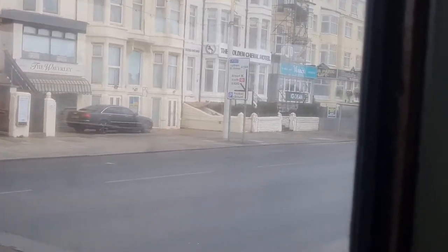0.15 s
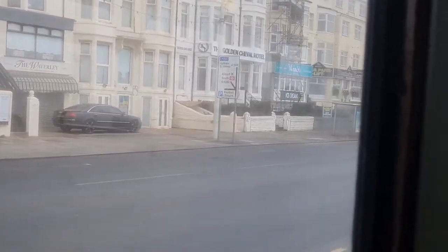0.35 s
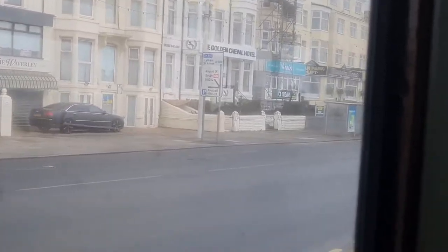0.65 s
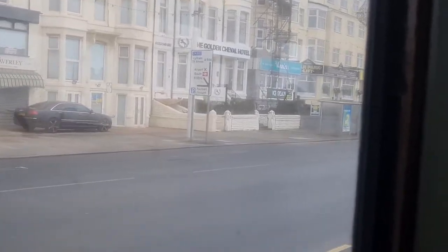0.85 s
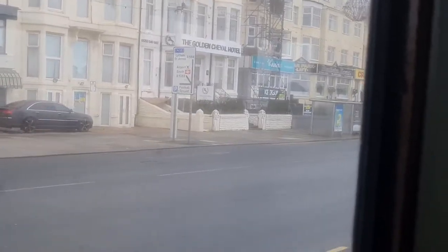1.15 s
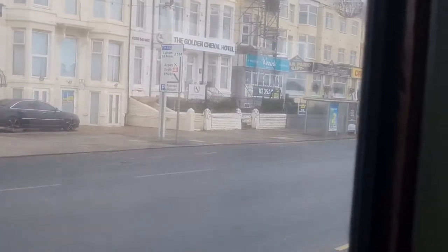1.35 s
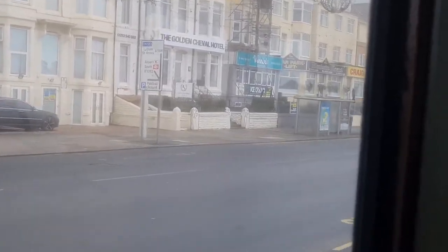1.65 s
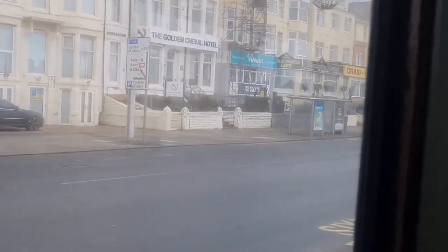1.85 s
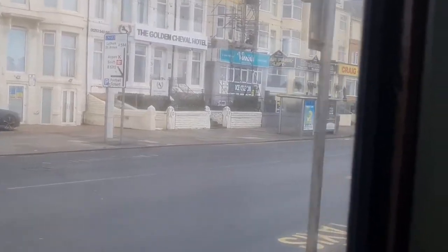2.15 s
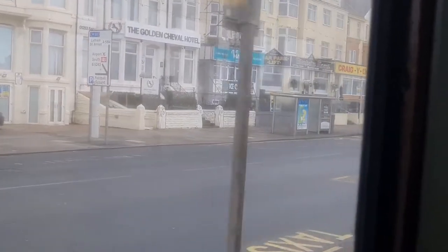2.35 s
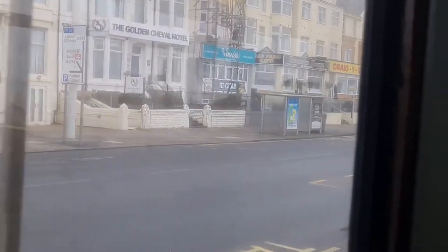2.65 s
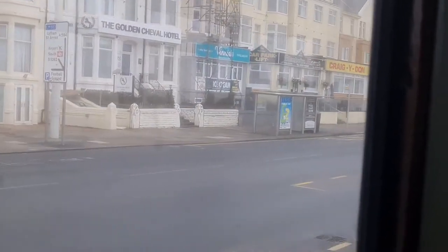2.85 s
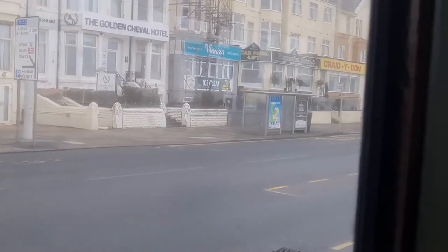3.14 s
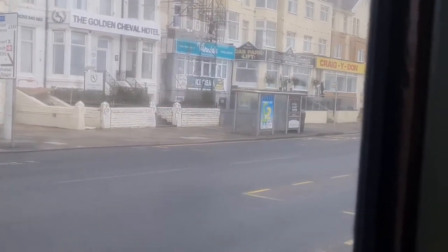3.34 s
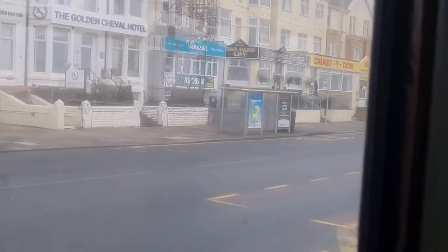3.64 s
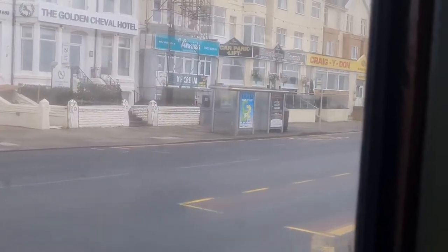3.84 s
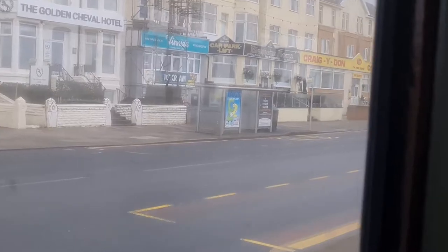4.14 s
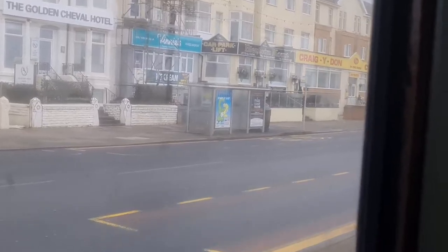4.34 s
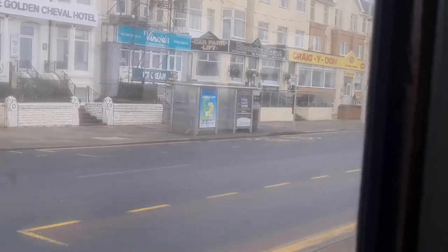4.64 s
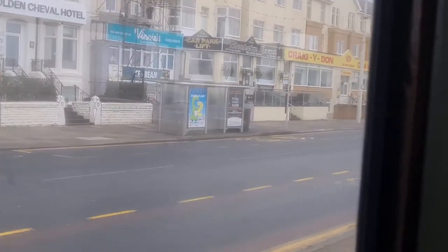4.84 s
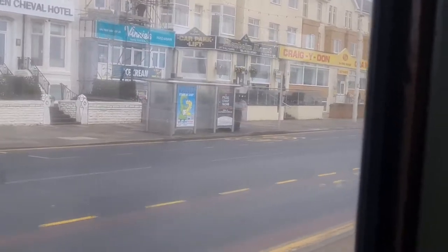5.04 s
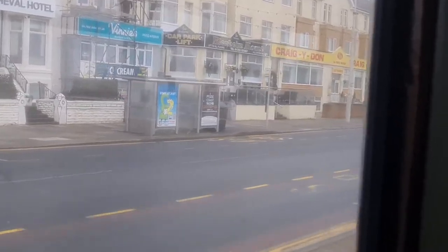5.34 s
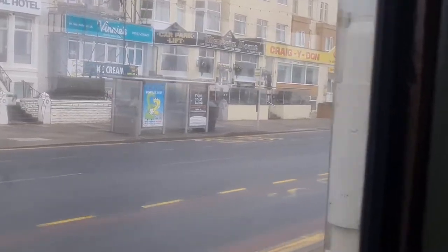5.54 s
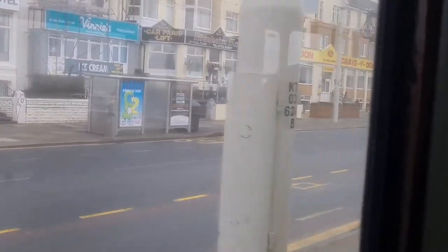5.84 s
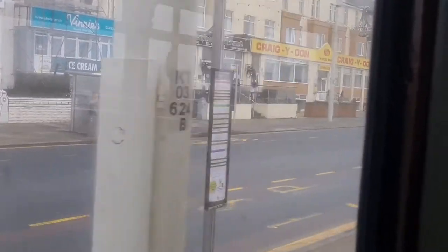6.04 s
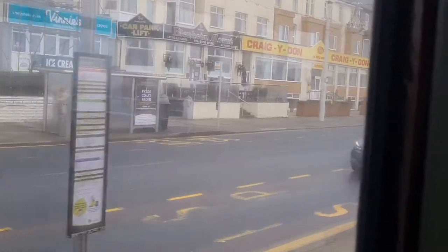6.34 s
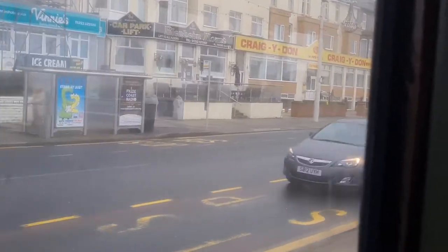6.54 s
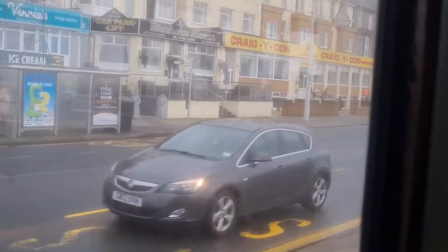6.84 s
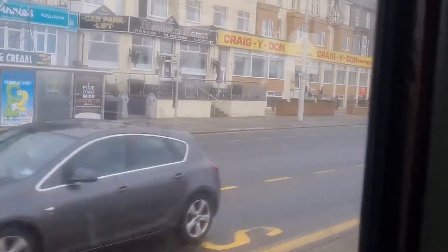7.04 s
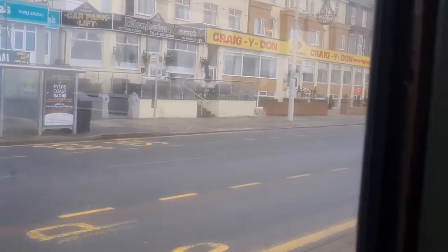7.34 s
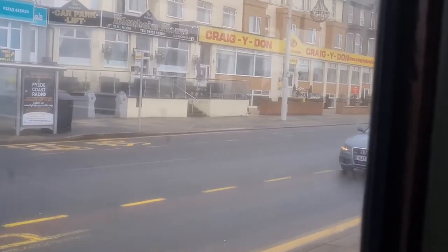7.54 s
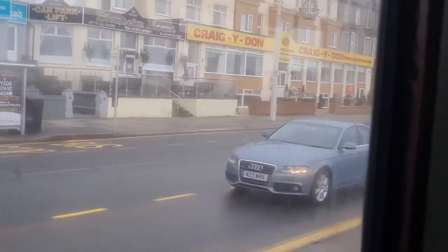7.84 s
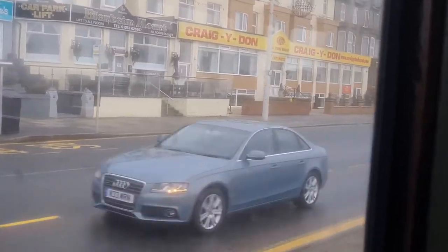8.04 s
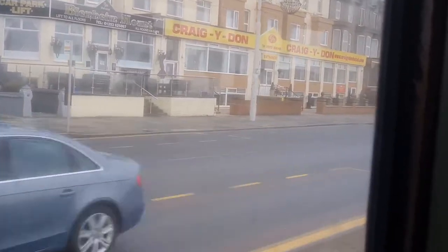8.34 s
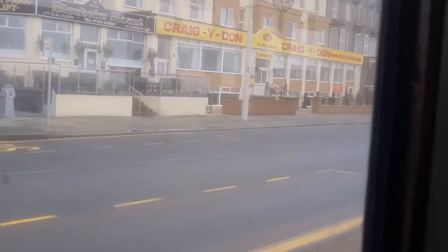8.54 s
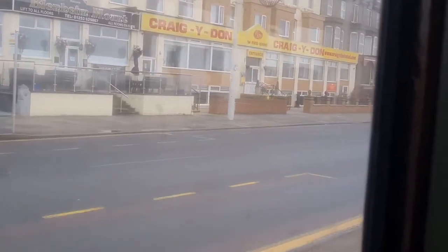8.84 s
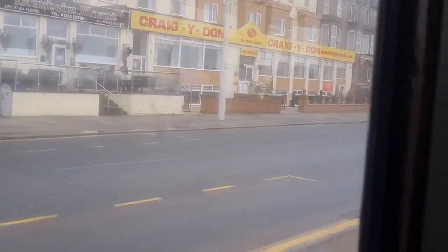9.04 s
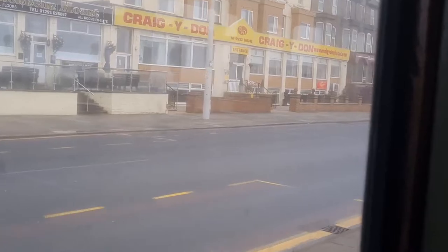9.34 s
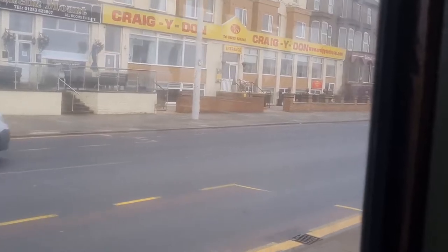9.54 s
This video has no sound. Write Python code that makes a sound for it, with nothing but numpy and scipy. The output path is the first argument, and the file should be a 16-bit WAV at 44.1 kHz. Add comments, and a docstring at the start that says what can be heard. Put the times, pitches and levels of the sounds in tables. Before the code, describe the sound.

Inside a rattling tram on uneven rails, deep booming rumble swells and eases, with panel rattle, faint squeaks, knocks and soft wet-road hiss.

```python
"""Inside a tram car on a seafront line. From the start uneven rails shake the shell, which booms at two low
modes, and the wheels rumble through the floor; panels rattle and fittings knock at jolts. Traction fizz and
faint hum run under it, wet tyres hiss outside in gusts. Joints squeak from 1.9 s; a wheel sings from 2.2 to
3.4 s; metal ticks ring from 4 s. The hardest knock falls at 6.9 s, the strongest boom at 7.7 s, gusts of
hiss at 7.6 and 8.3 s; near 9 s the rolling sinks, then swells again. Noise is shaped; modes are tones."""
import sys
import numpy as np
from scipy import signal
from scipy.fft import rfft, irfft, next_fast_len
from scipy.io import wavfile
from scipy.ndimage import uniform_filter1d, map_coordinates

SR = 44100
rng = np.random.default_rng(int(sys.argv[2]) if len(sys.argv) > 2 else 0)


def log_audio(samples):
    """Write samples as a 16-bit WAV file to the path given in sys.argv[1]."""
    # one column per channel
    frames = np.atleast_2d(samples).T
    # limit to full scale, then quantise
    limited = np.clip(frames, -1, 1)
    pcm = np.round(limited * 32767).astype(np.int16)
    wavfile.write(sys.argv[1], SR, pcm)


N = 426888
CONTROL_STEP = 64  # samples per point of the slow curves


def amp(db):
    """Decibels to amplitude."""
    return 10 ** (np.asarray(db) / 20)


def unit(x):
    """Scale to rms 1."""
    return x / np.sqrt(np.mean(np.abs(x) ** 2) + 1e-20)


def along(points, hz):
    """Interpolate (frequency [Hz], value) points on a log-frequency axis."""
    point_hz, value = np.transpose(points)
    return np.interp(np.log(hz + 1), np.log(point_hz + 1), value)


def curves(rows):
    """One value per sample for each column after the time."""
    time_s, *columns = np.transpose(rows)
    return [np.interp(np.arange(N) / SR, time_s, column) for column in columns]


def wobble(rate_hz):
    """Smooth random curve, rate_hz knots a second."""
    knots = rng.standard_normal(int(N * rate_hz / SR) + 4)
    return map_coordinates(knots, [np.arange(N) * rate_hz / SR])


def filtered(x, response):
    """Apply a complex frequency response; mirrored ends keep the edges from ringing."""
    edge = 4096
    x = np.pad(x, [(0, 0)] * (x.ndim - 1) + [(edge, edge)], "reflect")
    m = next_fast_len(N + 2 * edge)
    spectrum = rfft(x, m) * response(np.fft.rfftfreq(m, 1 / SR))
    return irfft(spectrum, m)[..., edge:edge + N]


# cabin diffuseness: (frequency [Hz], left-right correlation [-1..1])
LIKENESS = [(60, .95), (130, .97), (290, .8), (640, .22), (1410, -.14), (3100, .06), (15000, .1)]


def rush(spectrum, patchy_db, peaks=(), size=512):
    """Stereo noise of rms 1: spectrum, resonant peaks, patchy gain, left-right likeness of the cabin."""
    grid = signal.stft(rng.standard_normal((2, N)), nperseg=size)[2]
    patches = uniform_filter1d(rng.standard_normal(grid.shape[1:]), size=4, axis=0)
    patches = uniform_filter1d(patches, size=2 + 4096 // size, axis=1)
    pair = signal.istft(grid * amp(patchy_db * unit(patches)), nperseg=size)[1][:, :N]

    def mid_side(hz):
        turn = np.arccos(np.clip(along(LIKENESS, hz), -1, 1)) / 2
        lift_db = sum(db / (1 + (2 * (hz - center) / width) ** 2) for center, width, db in peaks)
        return amp(along(spectrum, hz) + lift_db) * [np.cos(turn), np.sin(turn)]

    mid, side = filtered(pair, mid_side)
    return unit(np.array([mid + side, mid - side]))


def tone(hz, width_hz, lead_rad, flutter_db, bend_hz=0):
    """Unsteady tone of rms about 1, its pitch wandering with its width; the left ear leads by lead_rad."""
    pitch_hz = hz + bend_hz + 0.4036 * width_hz * wobble(width_hz)
    phase = 2 * np.pi * np.cumsum(pitch_hz) / SR + rng.uniform(0, 2 * np.pi)
    level = np.sqrt(2) * amp(flutter_db * wobble(width_hz))
    return level * np.sin(phase + [[lead_rad / 2], [-lead_rad / 2]])


BOOM_RISE = 0.48  # share of a boom spent swelling


def swell(after_s, length_s):
    """Smooth hump peaking at after_s = 0, rising faster than it falls."""
    share = np.where(after_s < 0, BOOM_RISE, 1 - BOOM_RISE)
    return np.cos(np.pi / 2 * np.clip(after_s / length_s / share, -1, 1)) ** 2


# shell modes by name: (frequency [Hz], width [Hz])
SHELL_MODES = {"low": (55.5, 13), "high": (76.5, 14)}
# booms: (time of peak [s], length [s], pitch heard [Hz], peak level [dB])
SHELL_BOOMS = [(0.034, .2, 55.7, -14), (0.281, 0.16, 56.4, -13), (0.356, 0.13, 55.9, -14.5),
               (0.581, 0.08, 54.16, -12.5), (.72, 0.18, 57.9, -19), (0.979, .2, 50.94, -12),
               (1.147, 0.12, 54.3, -14), (1.334, 0.18, 59.7, -11.5), (1.479, .2, 55.05, -12),
               (1.619, 0.11, 69.7, -13), (1.721, 0.32, 56.25, -10), (1.785, 0.11, 74.2, -9.5),
               (1.967, .14, 78.2, -11.5), (2.067, .1, 65.6, -11), (2.147, .1, 67.3, -10.5),
               (2.227, 0.15, 54.1, -16.5), (2.344, 0.096, 66.2, -14.5), (2.63, .1, 78.25, -14),
               (2.733, 0.18, 58.62, -15.5), (2.875, 0.2, 58.2, -14.5), (3.122, .16, 57.98, -13),
               (3.236, 0.13, 56.97, -11), (3.375, 0.1, 54.2, -11), (3.473, 0.1116, 67.25, -4.5),
               (3.579, 0.12, 57.16, -12.5), (3.714, .2, 57.1, -9.5), (3.797, 0.12, 59.46, -6.5),
               (4.394, .2, 71.86, -18), (4.49, 0.12, 57.27, -15.5), (4.718, .12, 75.7, -14),
               (4.999, 0.19, 55.03, -15.5), (5.095, 0.14, 59.1, -7.5), (5.21, 0.11, 58.9, -11),
               (5.349, 0.14, 53.88, -9.5), (5.484, 0.21, 54, -8), (5.981, 0.089, 63, -11.5),
               (6.197, 0.19, 53.76, -17.5), (6.564, 0.22, 51, -16.5), (6.941, 0.11, 57.05, -6),
               (7.024, 0.091, 65, -12.5), (7.121, 0.12, 52.06, -7), (7.219, 0.18, 62.14, -14),
               (7.543, 0.098, 66, -8.5), (7.702, 0.23, 73.5, -4), (7.81, 0.21, 80.7, -10),
               (7.974, 0.12, 78, -8), (8.299, 0.18, 81.1, -15), (9.312, 0.19, 57, -12),
               (9.596, 0.18, 56.75, -11.5), (9.606, 0.12, 78.4, -14)]
# ring of the modes between booms: (time [s], low-mode level [dB], high-mode level [dB])
HELD_RING = [(0.0, -19.5, -28.5), (1.2, -22.5, -24.5), (1.6, -21, -20.5), (2.0, -21, -22.5),
             (2.5, -22.5, -32), (3.0, -22, -26), (3.6, -20, -26), (3.95, -24.5, -30.5), (4.6, -23.5, -27),
             (5.7, -23, -25), (6.3, -23, -27), (7.3, -25, -26), (7.9, -23, -21), (8.5, -24, -31),
             (8.95, -24.5, -41.5), (9.2, -25.5, -21), (9.68, -24, -22.5)]
SPLIT_HZ = 71  # booms pitched below bend the low tone, the others the high tone
HELD_WANDER_DB, SHAKEN_SHARE = 1.93, 0.62  # wander of the held ring; its noise relative to its tone


def shell():
    """Two modes ring as held tone plus shaken noise; booms swell the tone and pull its pitch."""
    out, lead_rad = 0, .5
    t = np.arange(0, N, CONTROL_STEP) / SR

    def per_sample(v):
        return np.interp(np.arange(N) / SR, t, v)

    for held_db, (name, (hz, width_hz)) in zip(curves(HELD_RING), SHELL_MODES.items()):
        held = amp(held_db + HELD_WANDER_DB * wobble(7))
        booms = [(amp(db) * swell(t - s, length), pitch) for s, length, pitch, db in SHELL_BOOMS
                 if (pitch < SPLIT_HZ) == (name == "low")]
        boom_power = per_sample(sum(e ** 2 for e, _ in booms))
        pull = per_sample(sum(e ** 2 * (pitch - hz) for e, pitch in booms))
        tone_power = boom_power + held ** 2

        def response(f):
            mode = 1j * f * width_hz / (hz * hz - f * f + 1j * f * width_hz)
            return mode ** 2 * np.exp([[.5j * lead_rad], [-.5j * lead_rad]])

        shaken = unit(filtered(rng.standard_normal(N), response))
        ring = tone(hz, .3 * width_hz, lead_rad, flutter_db=.6, bend_hz=pull / tone_power)
        out = out + np.sqrt(tone_power) * ring + SHAKEN_SHARE * held * shaken
    return out


def humps(time_s, width_s):
    """One bell curve per event on the slow grid; width_s is the half-width at 1/e."""
    t = np.arange(0, N, CONTROL_STEP) / SR
    return np.exp(-((t - time_s[:, None]) / width_s[:, None]) ** 2)


# wheels hit bumps: (time [s], half-width at 1/e [s], rumble lift [dB], rattle lift [dB])
BUMPS = [(.2, 0.044, 3.5, 3), (.68, 0.14, 3.5, 2), (.97, 0.062, 6.5, 2), (1.369, 0.073, 5, 2.5),
         (1.72, 0.063, 4.5, 4), (1.82, 0.058, -1, 5), (2.02, 0.088, 5, 7), (2.33, 0.066, 3, 4.5),
         (3.33, 0.055, -0.5, 6.5), (3.48, 0.086, 5.5, 5.5), (3.65, 0.037, 5.5, 3.5), (3.851, 0.061, 5, 3.5),
         (4.01, 0.038, 3, 6.5), (4.42, 0.054, -0.5, 5.5), (4.645, 0.059, -1, 6), (5.119, 0.12, 8.5, 5.5),
         (5.358, 0.046, 9.5, -1), (5.481, 0.061, 6, 3.5), (6.003, 0.09, 5, 5.5), (6.91, 0.051, 8.5, 4.5),
         (7.16, 0.083, 4.5, 3.5), (7.452, .05, 3, 5.5), (7.77, 0.043, 2, 2), (8.3, 0.14, 5.5, 2.5),
         (8.62, 0.12, 3.5, 3), (9.18, 0.062, 1.5, 5)]


def jolts():
    """Lifts of rumble and rattle in dB as the wheels hit bumps; overlapping bumps add."""
    time_s, width_s, *lifts_db = np.transpose(BUMPS)
    return [np.repeat(db @ humps(time_s, width_s), CONTROL_STEP)[:N] for db in lifts_db]


# rolling between bumps: (time [s], rumble level [dB], rattle level [dB])
ROLLING = [(0.0, -25, -50), (.5, -31.5, -54), (1.15, -30.5, -51.5), (1.4, -24.5, -48), (2.1, -24.5, -49),
           (2.4, -23, -49), (2.55, -29, -52), (2.8, -24, -48.5), (3.6, -25.5, -47), (4.25, -30.5, -54.5),
           (4.9, -30.5, -52), (5.3, -29.5, -49.5), (5.7, -29, -51), (6.7, -26.5, -49), (7.2, -24, -48),
           (7.7, -25.5, -47.5), (8.0, -30.5, -53.5), (9.05, -35, -57), (9.68, -22.5, -46.5)]
# rumble spectrum: (frequency [Hz], relative density [dB per Hz])
FLOOR_SPECTRUM = [(10, -120), (22, -9), (38, -5.5), (60, -14.5), (90, -3), (125, -2.5), (190, -7),
                  (330, -13), (415, -21), (626, -26.5), (1180, -39.5), (3300, -120)]
# cabin air modes: (frequency [Hz], width [Hz], lift [dB])
CABIN_MODES = [(102.2, 8.2, 6.5), (157.7, 15, 6), (289.7, 19, 3.5)]
# rattle spectrum: (frequency [Hz], relative density [dB per Hz])
PANEL_SPECTRUM = [(290, -39), (500, -22.5), (631, -4), (969, -11.5), (1510, -8), (2010, -13), (2700, -16.5),
                  (3200, -19.5), (5520, -27), (8000, -33.5), (10400, -70.5), (17600, -120)]
# panel resonances: (frequency [Hz], width [Hz], lift [dB])
PANEL_MODES = [(633, 40, 9), (860, 40, 3), (1030, 30, 3), (2450, 600, 2.5), (2600, 40, 4), (2865, 50, 4),
               (4200, 700, 3)]


def wheels():
    """Rolling noise through floor and air modes, plus chattering panels; bumps change both levels."""
    rumble_db, rattle_db = curves(ROLLING)
    rumble_lift_db, rattle_lift_db = jolts()
    rumble_level = amp(rumble_db + rumble_lift_db + 0.49 * wobble(11))
    rumble = rumble_level * rush(FLOOR_SPECTRUM, patchy_db=2.5, peaks=CABIN_MODES, size=4096)
    chatter = amp(0.8 * wobble(21) + 0.95 * wobble(40) + 0.4 * wobble(200))
    rattle = unit(chatter * rush(PANEL_SPECTRUM, patchy_db=1.02, peaks=PANEL_MODES))
    return rumble + amp(rattle_db + rattle_lift_db) * rattle


# fittings knock: (time [s], level before onset fade and decay [dB], t60 [s], band centre [Hz])
KNOCKS = [(0.191, -48, 0.17, 2500), (1.34, -46, 0.2, 3000), (1.701, -48, 0.15, 3280),
          (1.979, -45, 0.13, 3300), (2.85, -49, 0.14, 5170), (3.295, -45.5, 0.31, 8130),
          (3.439, -46, 0.065, 1975), (3.982, -54, 0.109, 2280), (4.279, -44.5, 0.14, 1104),
          (4.57, -52.5, 0.44, 2267), (6.755, -40.5, 0.27, 1106), (6.883, -39.5, 0.11, 1300),
          (6.895, -28, 0.16, 555), (7.742, -40.5, 0.1, 3603)]


def clacks():
    """Knocks: band noise, different in each ear, with a soft onset and exponential decay."""
    out, t = np.zeros((2, N + SR)), np.arange(SR // 2) / SR
    onset = 1 - np.exp(-t / .006)
    for s, db, t60_s, hz in KNOCKS:
        band = signal.butter(2, [hz / 1.6, min(hz * 1.6, SR / 2.1)], "bandpass", fs=SR)
        burst = unit(signal.lfilter(*band, rng.standard_normal((2, len(t)))))
        out[:, round(s * SR):][:, :len(t)] += amp(db - 60 * t / abs(t60_s)) * onset * burst
    return out[:, :N]


# metal parts tick: (time [s], frequency [Hz], main-mode level before onset fade and decay [dB])
TICKS = [(3.985, 1500, -46), (4.28, 1300, -46), (4.565, 1800, -49), (6.886, 1000, -34), (6.896, 1750, -40),
         (6.92, 1750, -43), (7.732, 4050, -41), (7.741, 3900, -42), (7.749, 2300, -44)]
PING_CYCLES = 130  # t60 in cycles of the main mode


def pings():
    """Ticks ring a close pair of modes that decay over a fixed number of cycles."""
    out, t = np.zeros((2, N + SR)), np.arange(SR // 4) / SR
    onset = 1 - np.exp(-t / .001)
    for s, hz, db in TICKS:
        main = np.sin(2 * np.pi * hz * t + [[.6], [-.6]])
        upper_hz = hz * rng.uniform(1.04, 1.1)
        upper = .5 * np.sin(2 * np.pi * upper_hz * t + rng.uniform(0, 6, (2, 1)))
        decay = amp(db - 60 * t * hz / PING_CYCLES)
        out[:, round(s * SR):][:, :len(t)] += decay * onset * (main + upper)
    return out[:, :N]


# joints squeak: (time [s], length [s], pitch [Hz], level before swell and flutter [dB])
JOINT_SQUEAKS = [(1.94, .1, 2600, -57), (2.25, .23, 2610, -56.5), (2.32, .1, 3750, -61),
                 (3.2, .3, 2600, -59), (3.89, .04, 2600, -55), (3.98, .07, 2600, -58),
                 (3.98, .06, 2100, -58), (4.39, .04, 2440, -53), (4.41, .05, 1600, -56),
                 (4.95, .08, 2870, -55), (5.115, .045, 2870, -51), (5.55, .04, 3000, -62),
                 (3.4, .06, 3880, -62)]


def squeaks():
    """Rubbing joints sing short notes of rough pitch and level that swell and fade."""
    out, span = np.zeros((2, N + SR)), 200
    for s, length_s, hz, db in JOINT_SQUEAKS:
        n = round(abs(length_s) * SR)
        rough = uniform_filter1d(rng.standard_normal((2, n + span)), size=span, axis=1)
        rough = rough[:, :n] * np.sqrt(span)
        phase = 2 * np.pi * np.cumsum(hz + 14 * rough[0]) / SR
        level = amp(db + 2.5 * rough[1]) * np.sqrt(2) * np.hanning(n) ** .3
        out[:, round(s * SR):][:, :n] += level * np.sin(phase + [[.9], [-.9]])
    return out[:, :N]


# fizz: (time [s], level [dB])
FIZZ_LEVEL = [(0.0, -64), (1.5, -61.5), (3.3, -61.5), (3.55, -65), (4.95, -65), (5.1, -60), (6.55, -61),
              (6.8, -56.5), (7.65, -60.5), (7.8, -69), (8.9, -69), (9.68, -60)]
# fizz spectrum: (frequency [Hz], relative density [dB per Hz])
FIZZ_SPECTRUM = [(3000, -120), (6500, -22), (7800, -15.5), (8700, -11), (9400, -13.5), (10500, -19),
                 (12000, -26), (20000, -120)]
# fizz resonances: (frequency [Hz], width [Hz], lift [dB])
FIZZ_MODES = [(8110, 92, 4), (8760, 83, 5), (9240, 58, 4)]
# thin tones: (frequency [Hz], width [Hz], level at mean rolling, before flutter [dB])
HUM_TONES = [(1130, 3, -63.5), (7899, 8, -79), (9243, 20, -78)]
# a wheel sings: (time [s], length [s], level before flutter [dB])
WHEEL_SINGS = [(2.2, .05, -45), (2.255, .04, -45), (2.315, .04, -46), (2.4, .2, -53), (2.65, .2, -54),
               (2.9, .33, -51), (3.24, .15, -49)]
SHAFT_HZ, SING_HZ, SING_FADE_S = 32.2, 1491, .015


def traction():
    """Fizz struck once per motor-shaft turn, thin tones following the rolling, a wheel's whine."""
    t = np.arange(N) / SR
    strikes = 1 + 0.42 * np.exp(-5.5 * (SHAFT_HZ * t % 1))
    fizz = unit(strikes * rush(FIZZ_SPECTRUM, patchy_db=1.0, peaks=FIZZ_MODES))
    fizz = amp(curves(FIZZ_LEVEL)[0]) * fizz
    hum = sum(amp(db) * tone(hz, width_hz, lead_rad=1.8, flutter_db=1.5) for hz, width_hz, db in HUM_TONES)
    rattle_db = curves(ROLLING)[1]
    hum = amp((rattle_db - rattle_db.mean()) / 2) * hum
    sing_level = sum(amp(db) * np.clip(np.minimum(t - s, s + length - t) / SING_FADE_S, 0, 1)
                     for s, length, db in WHEEL_SINGS)
    sing_level = sing_level * amp(2.5 * wobble(35) + 0.8 * wobble(14))
    return fizz + hum + sing_level * tone(SING_HZ, 28, lead_rad=2.4, flutter_db=1.5)


# hiss: (time [s], level before jolts and gusts [dB])
HISS_LEVEL = [(0.0, -75), (.9, -87), (1.3, -70.5), (2.0, -71), (2.5, -77), (3.2, -68), (3.75, -80.5),
              (4.2, -67.5), (5.6, -70.5), (6.5, -69), (7.0, -68), (7.6, -63.5), (7.9, -71.5), (8.3, -63.5),
              (8.8, -67), (9.68, -75)]
# hiss spectrum: (frequency [Hz], relative density [dB per Hz])
SPRAY_SPECTRUM = [(800, -120), (3000, -8), (5000, 0), (7000, -5.5), (11000, -7), (12500, -2),
                  (16000, -15.5)]


def street():
    """Wet-tyre hiss leaks in through the windows as gusty noise, more when a jolt shakes them."""
    gusts_db = 1.5 * wobble(3.6) + 1.5 * wobble(9)
    level = amp(curves(HISS_LEVEL)[0] + 0.74 * jolts()[1] + gusts_db)
    return level * rush(SPRAY_SPECTRUM, patchy_db=1.5)


def scene():
    """Sum of all sources."""
    return shell() + wheels() + clacks() + pings() + squeaks() + traction() + street()


# microphone colour: (frequency [Hz], left minus right [dB])
MIC_LEAN = [(60, -1.5), (130, 0.5), (290, 3), (640, -1.5), (1410, -0.5), (3100, 1), (6820, -1), (15000, 3)]
TOP_HZ = 15760


def record(dry):
    """Two microphones of slightly different colour; peaks near full scale clip; band limit at TOP_HZ."""
    leaning = filtered(dry, lambda hz: amp(along(MIC_LEAN, hz) * [[.5], [-.5]]))
    clipped = leaning / (1 + np.abs(leaning) ** 24) ** (1 / 24)
    return filtered(clipped, lambda hz: hz < TOP_HZ)


dry = scene()
out = record(dry)
log_audio(out)
```